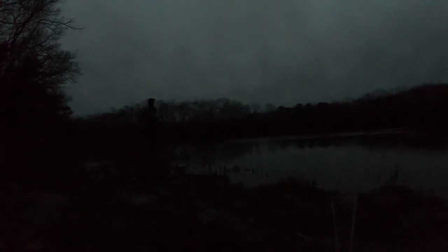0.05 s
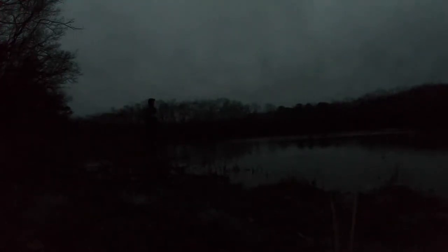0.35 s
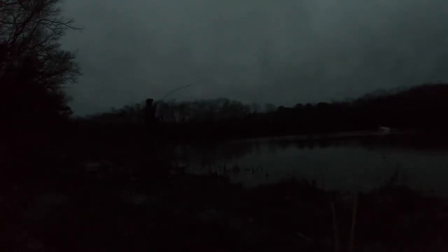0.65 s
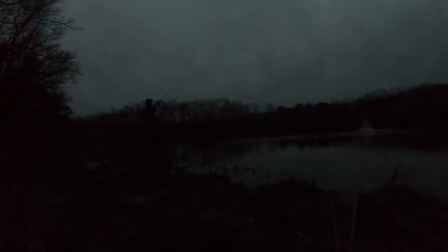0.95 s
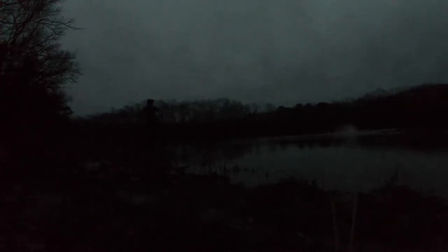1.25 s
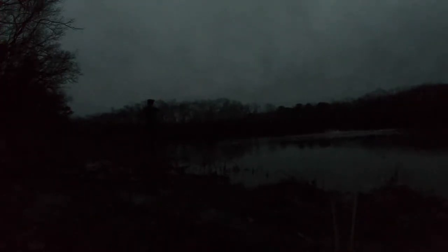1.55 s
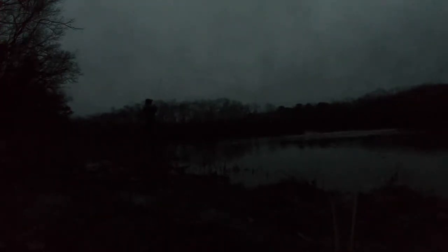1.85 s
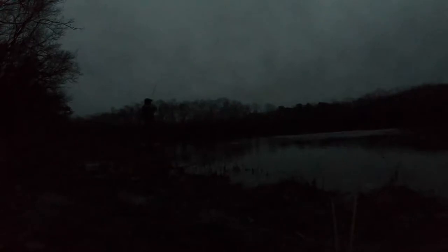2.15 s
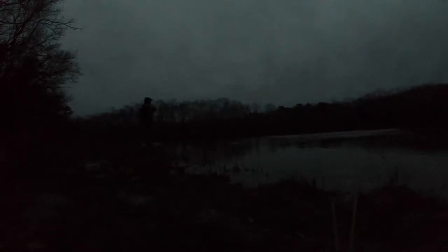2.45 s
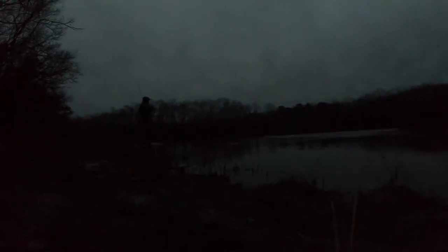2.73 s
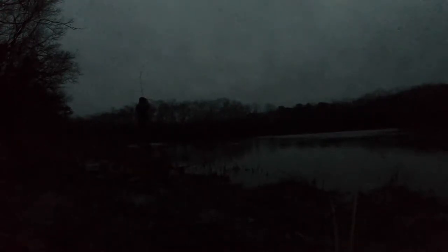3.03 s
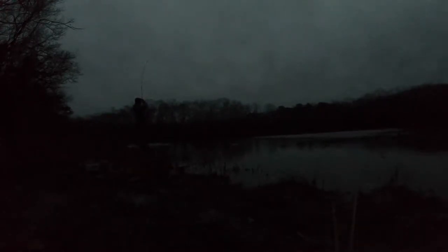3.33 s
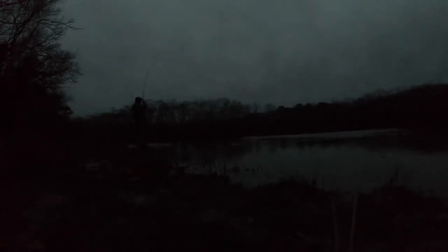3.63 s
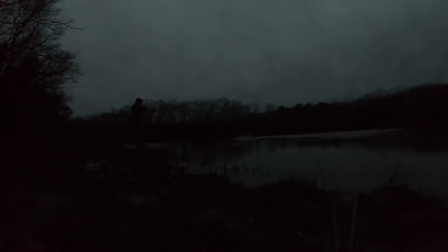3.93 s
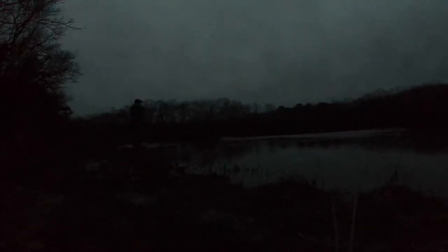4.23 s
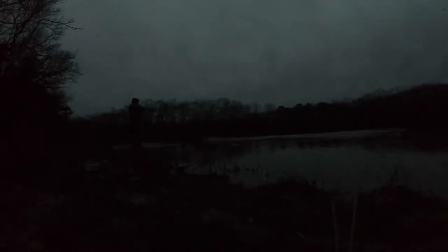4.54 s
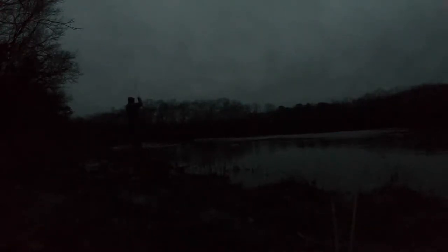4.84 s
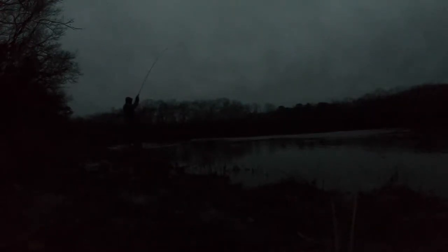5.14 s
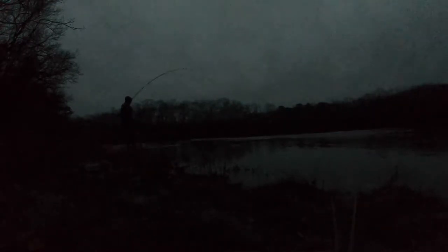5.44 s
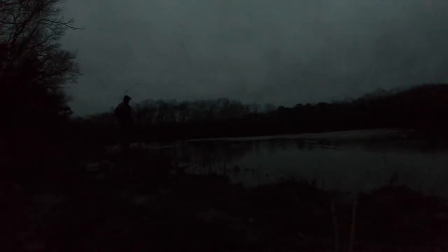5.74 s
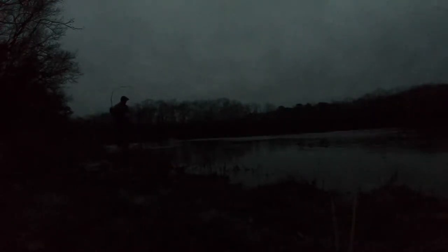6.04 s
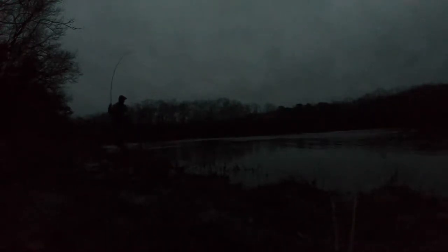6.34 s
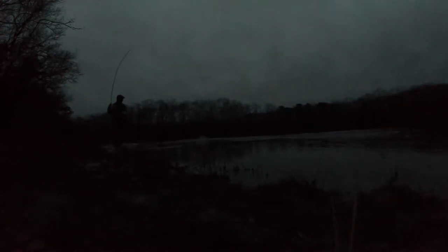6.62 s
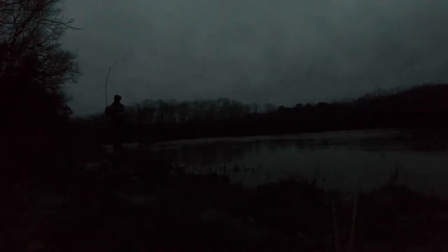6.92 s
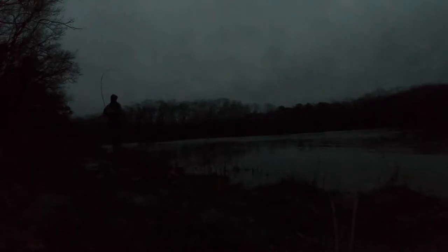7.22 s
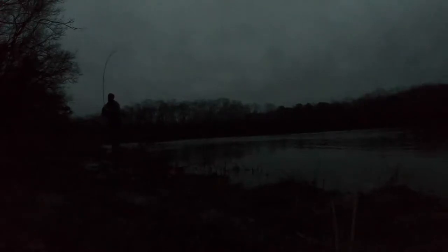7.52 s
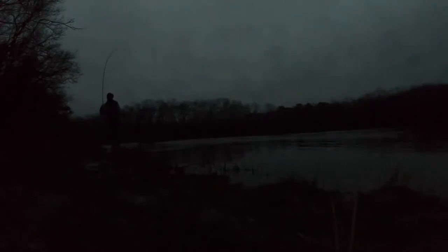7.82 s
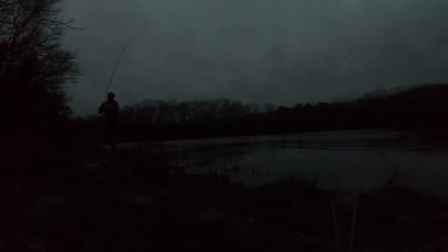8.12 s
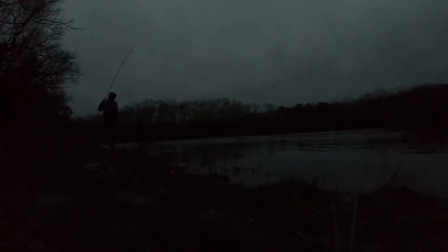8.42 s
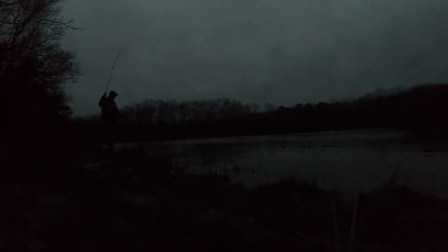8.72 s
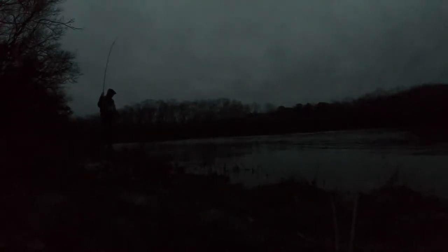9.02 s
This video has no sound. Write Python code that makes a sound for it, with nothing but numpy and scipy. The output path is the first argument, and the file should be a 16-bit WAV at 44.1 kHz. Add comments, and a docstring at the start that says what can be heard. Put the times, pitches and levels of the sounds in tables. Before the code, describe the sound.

Someone wades slowly through the shallows of a quiet pond. After a faint trickle, the first stride pushes through straight ahead from about 0.7 to 2.2 seconds, swelling with bubbling churn, sharp slaps and pattering spray, and ending in a hollow plunge. Water trickles and drips as the sound starts moving left. A second stride sloshes from 3.5 to 4.9 seconds, strongest near 4, followed by small gulps and ticking drops. The third runs from about 5.9 to 7.3 seconds, now well to the left, with a cluster of splashes around 7. Softer trickling, drips and thin hisses of water follow, until a fourth stride begins near 8.9 seconds and splashes at the end. The bank adds a very short, slight echo. Throughout, a distant road gives a low hum with gently swelling engine drones, under the faint hiss of a breeze.

```python
"""Wading through a pond

Slow strides cross the shallows, first straight ahead, then moving off to the left. Each stride swells
and eases, churning up ringing bubbles and throwing a patter of spray. Splashes, slaps, plunges and the
gulps of closing air pockets stand out; water trickles and drips between them. The bank gives a short
answer, and behind it all a far road hums under a faint breeze."""
import sys
import numpy as np
from scipy import signal
from scipy.fft import rfft, irfft, next_fast_len
from scipy.io import wavfile
from scipy.ndimage import map_coordinates

SR = 44100
rng = np.random.default_rng(int(sys.argv[2]) if len(sys.argv) > 2 else 0)


def to_wav(sig):
    """Store sig (one row per channel, or 1-D mono) as 16-bit WAV at the path in sys.argv[1].

    Samples outside -1..1 are clipped; the rate is SR.
    """
    pcm = np.clip(np.atleast_2d(sig), -1, 1) * 32767
    pcm = np.round(pcm).astype(np.int16)
    wavfile.write(sys.argv[1], SR, pcm.T)  # frames by channels


N = 408807

# Cue levels are faders, set ahead of each layer's own trim and EQ; t60 is the time to die by 60 dB.
# a leg pushing through the water: start t/s, hardest push t/s, end t/s, spray level/dB,
# coarse over fine spray/dB, churn level/dB, shallow over deep churn/dB
STRIDES = [(0.714, 1.518, 2.21, -48, 6, -58, 7), (3.49, 4.107, 4.88, -52.5, 6.5, -58, 7.5),
           (5.92, 6.867, 7.263, -52.5, 1.5, -64.5, -3.5), (8.89, 9.27, 9.27, -49.5, -13, -54, 9)]
# water running off and lapping between strides: start t/s, end t/s, spray level/dB, churn level/dB
TRICKLES = [(0.227, 0.27, -77.5, -72), (0.6, 0.705, -66.5, -72), (2.19, 2.317, -63, -70),
            (2.347, 2.845, -77, -71.5), (2.886, 3.092, -65, -66), (3.175, 3.47, -70, -70),
            (4.973, 5.13, -64.5, -71), (5.2, 5.556, -74, -72.5), (5.708, 5.894, -63.5, -65),
            (7.496, 7.82, -68, -72), (7.902, 8.36, -66.5, -68), (8.59, 8.83, -66, -66)]
# sheets of water thrown up and falling back: t/s, length/s, level/dB, coarse over fine spray/dB
SPLASHES = [(0.726, 0.017, -59, 16), (0.897, 0.064, -47, -6), (1.148, 0.013, -46, -12),
            (1.285, 0.039, -53, 11.5), (1.457, 0.037, -46, 7), (1.57, 0.051, -49, 0),
            (1.757, 0.1, -52, 7.5), (1.985, 0.075, -62, 13), (2.032, 0.039, -60, 9),
            (3.58, 0.36, -58.5, 5.5), (3.652, 0.032, -53, 5.5), (3.921, 0.03, -49, 6),
            (4.017, 0.025, -52, 12), (4.073, 0.042, -50.5, 6), (4.388, 0.059, -49, 4.5),
            (4.515, 0.066, -52.5, 7.5), (4.902, 0.12, -58, 8.5), (5.978, 0.13, -51.5, -1),
            (6.23, 0.17, -55.5, 0), (6.639, 0.053, -50.5, 5.5),  (6.777, 0.016, -53.5, 15.5),
            (6.846, 0.041, -60.5, 16.5), (6.901, 0.032, -45.5, 2), (6.923, 0.026, -49, 8),
            (6.975, 0.035, -50.5, 9), (7.055, 0.054, -53.5, 11.5), (7.156, 0.025, -44.5, 8),
            (7.263, 0.052, -50.5, -3), (7.946, 0.045, -59, -20), (8.833, 0.094, -55, -10),
            (9.28, 0.24, -61, 6)]
# waves folding into a cloud of bubbles: t/s, length/s, level/dB, shallow over deep churn/dB
SLOSHES = [(0.772, 0.049, -55, 18.5), (0.843, 0.057, -50, -1), (1.248, 0.09, -56.5, 14),
           (1.468, 0.038, -51.5, 15), (1.576, 0.042, -49, 4), (1.74, 0.13, -52.5, -4.5),
           (3.625, 0.092, -59.5, 3), (3.899, 0.012, -49, -8), (4.003, 0.028, -52, -21),
           (4.21, 0.15, -59, -8.5), (4.334, 0.095, -57.5, 12), (4.415, 0.02, -46.5, 10),
           (4.892, 0.064, -63, 19), (5.972, 0.088, -56, 13), (6.123, 0.056, -54.5, -13),
           (6.215, 0.053, -51, 1), (6.687, 0.087, -56.5, 14.5), (6.876, 0.07, -51, 3),
           (7.076, 0.14, -55, 7), (7.246, 0.044, -56.5, 10), (8.982, 0.16, -53, -7.5),
           (9.262, 0.12, -53, 22)]
# tongues of water slapping the surface: t/s, level/dB, f/Hz, splatter t60/s
SLAPS = [(0.869, -19, 2380, 0.063), (1.025, -25.5, 4600, 0.085), (1.046, -21.5, 5560, 0.025),
         (1.179, -24, 2720, 0.15), (1.2722, -14, 3620, 0.026), (1.584, -27, 4370, 0.022),
         (1.909, -22, 3500, 0.024), (2.002, -18.5, 2160, 0.062), (2.068, -24, 3650, 0.0058),
         (2.8612, -35, 3700, 0.027), (2.8945, -37, 4500, 0.022), (3.659, -23, 3800, 0.018),
         (3.911, -17, 2800, 0.042), (4.083, -24, 3460, 0.03), (4.106, -28, 3000, 0.018),
         (4.169, -22, 3900, 0.022), (4.3905, -26.5, 6100, 0.013), (4.6132, -31.5, 4200, 0.01),
         (4.8805, -40, 4000, 0.016), (4.931, -30.5, 3440, 0.023), (6.492, -19.5, 4900, 0.036),
         (6.6302, -24, 4230, 0.13), (6.689, -19.5, 3620, 0.048), (7.157, -27, 4360, 0.029),
         (7.2385, -27, 4320, 0.04), (8.204, -33, 4540, 0.075), (8.3108, -37.5, 4200, 0.042),
         (8.952, -28.5, 3950, 0.085)]
# air pockets closing: t/s, level/dB, starting f/Hz, t60/s, share by which the pitch climbs within t60
GULPS = [(.238, -52, 798, 0.081, 1.2), (.838, -40.5, 716, 0.067, 0.79), (1.439, -38, 325, 0.14, 1.47),
         (1.634, -35, 810, 0.029, 0.53), (1.728, -39, 329, 0.047, 0.38), (1.952, -41.5, 1420, 0.038, .2),
         (2.039, -29.5, 656, 0.03, 0.25), (2.072, -39.5, 468, 0.071, 2.1), (2.843, -55, 986, 0.059, 1.05),
         (2.891, -52.5, 880, 0.064, 1.1), (3.035, -49, 586, 0.053, 0.35), (3.04, -53.5, 1345, 0.045, 0.23),
         (3.705, -38.5, 830, 0.02, .2), (3.822, -45.5, 660, 0.023, .1), (3.905, -38.5, 475, 0.038, 0.37),
         (3.909, -29, 990, 0.033, 1.23), (3.986, -42, 265, .075, 1), (4.011, -40, 209, 0.052, 2.4),
         (4.022, -41, 535, 0.064, 0.24), (4.176, -38, 504, 0.063, 0.15), (4.215, -44, 572, .05, 0.35),
         (4.29, -45.5, 389, .17, 2.14), (4.412, -41, 895, 0.029, 0.38), (4.586, -41, 556, 0.035, .5),
         (4.668, -42, 662, 0.037, 0.56), (5.112, -41.5, 844, 0.023, 0.11), (5.437, -39, 597, 0.019, 0.58),
         (5.797, -44.5, 873, 0.031, 0.71), (6.111, -34, 1320, 0.023, 0.27), (6.118, -42.5, 390, 0.05, 0.52),
         (6.195, -43, 581, 0.093, 1.23), (6.284, -41, 593, 0.058, 0.33), (6.445, -49, 845, 0.048, 0.71),
         (6.617, -43.5, 850, .045, 0.36), (6.702, -47, 447, 0.047, 2.3), (6.707, -41, 339, 0.06, 0.38),
         (7.081, -43, 1044, 0.022, 0.39), (7.099, -43.5, 303, 0.031, 1.7),
         (7.234, -35.5, 674, 0.035, 0.091), (7.242, -40.5, 433, 0.059, 0.48), (7.311, -47, 870, .025, .1),
         (7.674, -56, 950, .07, .1), (7.745, -47.5, 1110, 0.016, .2), (8.082, -52, 1010, 0.033, .1),
         (8.152, -53, 634, 0.052, 0.32), (8.209, -51, 920, 0.024, .1), (8.475, -56, 900, 0.041, 0.56),
         (8.534, -52, 1300, 0.051, 0.91), (8.897, -41, 520, 0.04, 0.23), (8.932, -39.5, 563, .035, 0.22),
         (8.976, -39.5, 462, 0.071, 0.55), (9.237, -38.5, 1450, 0.07, 0.54)]
# blunt blows pushing a cavity into the water: t/s, level/dB, f/Hz, thump level/dB
PLUNGES = [(.868, -32.5, 1050, -55), (0.966, -29, 1450, -54), (1.272, -27.5, 2100, -59),
           (1.462, -44, 1290, -39), (2.0403, -27.5, 680, -27.5), (2.0422, -28.5, 1690, -45),
           (3.9116, -44, 990, -38), (4.011, -33, 564, -40), (4.106, -37.5, 890, -52),
           (4.169, -26.5, 1230, -48), (4.427, -31, 1320, -51), (5.112, -41, 930, -55),
           (5.439, -40.5, 640, -58), (7.026, -30.5, 1010, -50), (7.237, -40, 720, -50),
           (8.312, -47, 560, -56), (9.238, -29.5, 1100, -50)]
# single drops: t/s, level/dB, nominal f/Hz, t60/s
DRIPS = [(1.8168, -41.5, 3280, .03), (1.8377, -41.5, 6470, .016), (1.918, -42.5, 6700, .02),
         (2.2544, -48, 3270, 0.012), (4.7655, -48, 4480, .008), (4.939, -46, 5400, .01),
         (4.955, -45, 3470, 0.014), (5.1257, -46.5, 3800, 0.0034), (5.545, -41, 4660, 0.01),
         (5.557, -43.5, 5700, 0.0056), (5.704, -43, 5140, 0.0051), (5.7323, -37.5, 4040, 0.0027),
         (5.844, -44.5, 5200, 0.013), (5.918, -37, 5150, 0.004), (5.982, -38.5, 3820, 0.0087),
         (6.5578, -38.5, 4550, 0.0072), (6.578, -38.5, 3400, 0.0086), (6.608, -39, 5630, 0.005),
         (6.838, -35.5, 5000, 0.013), (7.06, -40.5, 5230, 0.013), (7.0755, -39.5, 3550, 0.0095),
         (7.1289, -35.5, 4650, 0.0036), (7.289, -41.5, 5400, .013), (7.3093, -40, 5750, 0.0049),
         (7.5364, -40.5, 3940, .0068), (7.9508, -40.5, 5350, .0069), (8.056, -46, 5820, 0.0049),
         (8.3857, -54.5, 3840, 0.014), (8.504, -46, 4940, 0.0062), (8.642, -51, 5300, 0.0067),
         (9.126, -42, 5190, 0.0058)]
# thin, hissing jets: start t/s, length/s, level/dB, first f/Hz, last f/Hz
SWISHES = [(3.247, 0.44, -70.5, 3730, 5560), (7.879, 0.32, -72, 4850, 2950), (8.647, 0.23, -66, 3000, 4830)]
# the finest spray after a hard splash: t/s, length/s, level/dB
SPARKLES = [(.885, .045, -70), (4.073, .06, -81), (4.414, 0.047, -81), (6.638, .03, -70), (6.938, .09, -80),
            (7.144, 0.044, -77), (9.27, 0.089, -79)]

# EQ of spray and drips: f/Hz, level/dB
SPRAY_EQ = [(300, -32.5), (900, -20), (1900, -16), (2600, -8.5), (3800, -0.5), (5000, -0.5), (5900, 3),
            (7300, -7), (8300, -24), (9500, -35), (10300, -45), (13000, -48.5), (16000, -49)]
# EQ of the churning water: f/Hz, level/dB
CHURN_EQ = [(120, 0), (300, -5.5), (600, -1), (1200, 2.5), (1900, -1), (3000, -14), (8000, -81)]
# EQ of the slaps: f/Hz, level/dB
SLAP_EQ = [(200, -14.5), (1200, -5.5), (3000, 1), (6000, 8.5), (7400, 4), (8400, -12), (9600, -11),
           (10500, -25), (13000, -7), (16000, -24)]
# the wader's path: t/s, position (0 ahead, 1 left), extra lean to the left/dB
PATH = [(0, 0, 0), (2, 0, 0), (3.4, .7, 0), (4.4, .75, -.5), (6, .85, 0), (7.2, .95, 0), (8, 1, 1.2),
        (8.9, 1, 3)]
# stereo image straight ahead: f/Hz, level/dB, left over right/dB, phase lead of the left/rad
IMAGE_AHEAD = [(300, 0, 6, -.8), (550, 0, 3, -1.5), (870, 0, -3.5, -1.6), (1500, 0, -4.5, -.7),
               (2550, 1, -5, -.7), (4000, 1.2, -1, -.5), (5050, -5, 1, -1.4), (6000, .5, 2.5, -1.4),
               (7500, 3, 4.5, -1.5), (9500, 7, 2, -1.2)]
# stereo image off to the left: f/Hz, level/dB, left over right/dB, phase lead of the left/rad
IMAGE_LEFT = [(300, 0, 6.5, -.8), (550, 0, 5, -1.4), (870, 0, 2, -1.6), (1500, 0, 2.5, -.7),
              (2550, -1, 1.5, -.7), (4400, 1, 4.3, 0), (7500, -2, 4, .7), (9500, -4, 2, .4)]
# stereo width of spray and churn: f/Hz, left-right correlation
WATER_LIKENESS = [(150, 0.63), (500, 0.64), (1000, 0.46), (4500, 1), (7000, 0.32), (10000, 0.2)]
# decay of the bank's answer: f/Hz, t60/s
BANK_DECAY = [(200, 0.023), (2000, 0.29), (10000, 0.11)]

# EQ of the road's rumble: f/Hz, level/dB
RUMBLE_EQ = [(25, -20), (60, -15), (110, -20.5), (128, -20), (142, -1.5), (180, -1.5), (235, 3),
             (265, -4.5), (310, -7), (400, -14), (550, -24), (1200, -70.5)]
# fader ride of the lower engine drone: t/s, level/dB
LOW_DRONE_RIDE = [(0, -63.5), (0.45, -71.5), (0.85, -61.5), (1.65, -79.5), (2.4, -64), (3.0, -71),
                  (4.8, -65), (5.4, -74.5), (6.1, -66), (6.38, -54), (6.75, -65.5), (7.05, -62.5),
                  (7.8, -62), (8.2, -68), (8.7, -68.5), (9.0, -58.5), (9.27, -77)]
# fader ride of the higher engine drone: t/s, level/dB
HIGH_DRONE_RIDE = [(0, -81), (0.5, -65), (1.6, -91), (2.2, -58.5), (3.0, -69.5), (4.7, -72), (5.3, -67),
                   (6.0, -70), (7.0, -74), (7.4, -57.5), (7.65, -53.5), (8.0, -64), (8.3, -58.5),
                   (9.27, -67.5)]
# EQ of the breeze: f/Hz, level/dB
BREEZE_EQ = [(300, -25.5), (550, -7), (820, 3), (1300, -15.5), (2200, -14.5), (4000, -19.5), (6500, -13),
             (8300, -24), (12500, -30.5), (15500, -47)]

SURGE_LEAD_S = .3  # run-up to the peak of a surge


def wading(spray_db=1, churn_db=-2, bank_db=-13, low_cut_hz=195):
    """The water sounds, thinned of deep bass, come from one spot that drifts to the left."""
    fine, coarse, deep, shallow = flow()
    source = amp(spray_db) * spray(fine, coarse) + amp(churn_db) * churn(deep, shallow)
    source = source + swishes() + slaps() + plunges() + drips() + gulps()
    source = signal.lfilter(*signal.butter(2, low_cut_hz, "highpass", fs=SR), source)
    position, lean_db = curves(PATH)
    ahead = heard_from(IMAGE_AHEAD, source)
    left = panned(heard_from(IMAGE_LEFT, source), lean_db)
    direct = (1 - position) * ahead + position * left
    return direct + amp(bank_db) * bank(direct) + sparkles()


def flow():
    """Strides, trickles, splashes and sloshes drive the gains of the spray and churn layers."""
    t, power = np.arange(N) / SR, np.zeros((4, N))
    sag_db = np.array([[8], [10], [5], [5]])  # each layer's drop from hardest push to a stride's ends
    for start, push, end, *levels in STRIDES:
        slack = np.interp(t, [start, push, end], [1, 0, 1])
        stride_db = gate(start, end, attack_s=.011, release_s=.14) - sag_db * slack
        power += layer_powers(*levels) * amp(stride_db) ** 2
    for start, end, spray_db, churn_db in TRICKLES:
        trickle = amp(gate(start, end, attack_s=.29, release_s=.28))
        power += layer_powers(spray_db, coarse_db=-2.5, churn_db=churn_db, shallow_db=4) * trickle ** 2
    for s, length, db, coarse_db in SPLASHES:
        splash = layer_powers(spray_db=db, coarse_db=coarse_db)[:2] * surge(length)
        add(power[:2], s - SURGE_LEAD_S, splash)
    for s, length, db, shallow_db in SLOSHES:
        slosh = layer_powers(churn_db=db, shallow_db=shallow_db)[2:] * surge(length)
        add(power[2:], s - SURGE_LEAD_S, slosh)
    return np.sqrt(power)


def layer_powers(spray_db=0, coarse_db=0, churn_db=0, shallow_db=0):
    """Powers of fine spray, coarse spray, deep churn and shallow churn."""
    tilt_db = shallow_db / 2
    return amp([[spray_db], [spray_db + coarse_db], [churn_db - tilt_db], [churn_db + tilt_db]]) ** 2


def spray(fine_gain, coarse_gain, ping_db=-7, tick_db=-18, split_hz=3100, flutter_db=1.92, sway_db=1.77):
    """Falling droplets patter and tick over a fine mist; a few ring briefly, coarse ones sound lower."""
    patter = swarm(1200, 9000, cycles=7, rise=.1, scatter_db=2.3, count=17000, samples=160)
    pings = swarm(1500, 7000, cycles=40, rise=.08, scatter_db=3.1, count=1700, samples=1000)
    ticks = swarm(2800, 7000, cycles=9, rise=.1, scatter_db=2, count=420, samples=200)
    mist = rng.standard_normal((2, N))
    fizz = patter + amp(ping_db) * pings + amp(tick_db) * ticks + mist
    fizz = spread(coloured(fizz, SPRAY_EQ), WATER_LIKENESS)
    lows = filtered(fizz, lambda hz: 1 / (1 + (hz / split_hz) ** 10))
    fine = fine_gain * (fizz - lows) * amp(flutter_db * wobble(90))
    coarse = coarse_gain * lows * amp(flutter_db * wobble(90))
    return (fine + coarse) * amp(sway_db * wobble(22))


def churn(deep_gain, shallow_gain, wash_db=1, split_hz=850, sway_db=1.9):
    """Larger bubbles gurgle in the wash; shallow stirring makes smaller, higher ones."""
    gurgle = swarm(260, 2000, cycles=10, rise=.35, scatter_db=1.8, count=3300, samples=1500)
    wash = amp(wash_db) * rng.standard_normal((2, N))
    mix = spread(coloured(gurgle + wash, CHURN_EQ), WATER_LIKENESS)
    lows = filtered(mix, lambda hz: 1 / (1 + (hz / split_hz) ** 4))
    deep = deep_gain * lows * amp(sway_db * wobble(25))
    shallow = shallow_gain * (mix - lows) * amp(sway_db * wobble(25))
    return deep + shallow


def slaps(trim_db=-9, splatter_db=-13, burst_t60=.029, brightness=1.64):
    """Water cracks on the surface, bursts and splatters; a broad, low slap has little treble."""
    track, t = np.zeros((2, N)), np.arange(SR // 12) / SR
    for s, db, hz, t60 in SLAPS:
        noise = rng.standard_normal((3, len(t)))
        sides, centre = noise[:2], noise[2]
        crack = peak_one(bubble(t, hz, t60=.0034, rise=.02, attack_s=.000088))
        burst = .09 * centre * amp(-60 * t / burst_t60)
        splatter = (1.4 * centre + 2.3 * sides) * amp(splatter_db - 60 * t / t60)
        lowpass = signal.butter(4, brightness * hz, fs=SR)
        add(track, s + .001062, amp(db + trim_db) * signal.lfilter(*lowpass, crack + burst + splatter))
    return coloured(track, SLAP_EQ)


def gulps(big_db=-6, small_db=-15, quiver_per_s=170, quiver_cycles=.16, throb_db=2.2, shed_s=.023):
    """A cavity closes into one big bubble that swells, glides up, quivers and sheds five small ones."""
    track, t = np.zeros(N), np.arange(SR // 5) / SR
    quiver, throb = wobble(quiver_per_s), wobble(quiver_per_s)  # unsteady shape sways phase and level
    for s, db, hz, t60, rise in GULPS:
        span = (round(s * SR) + np.arange(len(t))) % N
        shift_s = quiver_cycles * np.minimum(2 * t / t60, 1) * quiver[span] / hz
        big = peak_one(bubble(np.abs(t + shift_s), hz, t60, rise, attack_s=.16 * t60))
        add(track, s, amp(db + big_db + throb_db * throb[span]) * big)
        for delay, pitch, life in rng.random((5, 3)):
            small_hz = hz * 2 ** (1.9 * pitch - .9)  # within an octave either way
            small = bubble(t, small_hz, t60=.038 * (.5 + life), rise=.18, attack_s=.00069)
            add(track, s + shed_s * delay ** 2, amp(db + small_db) * small)
    return track


def plunges(ring_t60=.014, froth_t60=.028, froth_gain=.25, swell_s=.0025):
    """A blunt blow: a low thump and a few swings of pressure inside a dull burst of froth."""
    track, t = np.zeros(N), np.arange(SR // 20) / SR
    for s, db, hz, thump_db in PLUNGES:
        band = signal.butter(3, [hz / 2, hz * 2], "bandpass", fs=SR)
        froth = rms_one(signal.lfilter(*band, rng.standard_normal(len(t))))
        envelope = np.minimum(t / swell_s, 1) * amp(-60 * np.maximum(t - swell_s, 0) / froth_t60)
        ring = bubble(t, hz, ring_t60, rise=.081, attack_s=1 / hz)
        thump = bubble(t, hz=190, t60=.022, rise=0, attack_s=.00056)
        add(track, s - swell_s / 2, amp(db) * froth_gain * froth * envelope)
        add(track, s, amp(db - 3.5) * ring + amp(thump_db) * thump)
    return track


def drips(trim_db=2.5, detune=.951, max_rise=1.02, tick_t60=.0086):
    """A drop ticks on the surface and traps a tiny bubble; some chirp upwards, others hardly glide."""
    track, t = np.zeros(N), np.arange(SR // 25) / SR
    for s, db, hz, t60 in DRIPS:
        chirp = peak_one(bubble(t, detune * hz, t60, max_rise * rng.random() ** 2, attack_s=.00046))
        tick = rng.standard_normal(len(t)) * amp(-60 * t / tick_t60)
        add(track, s, amp(db + trim_db) * (chirp + tick))
    return coloured(track[None], SPRAY_EQ)


def swishes(width=.08):
    """A narrow hiss slides in pitch as its jet thins or thickens."""
    track = np.zeros(N)
    for s, length, db, first_hz, last_hz in SWISHES:
        progress = np.linspace(0, 1, int(length * SR))
        phase = 2 * np.pi * np.cumsum(first_hz * (last_hz / first_hz) ** progress) / SR
        noise = rng.standard_normal((2, SR))[:, :len(progress)]
        slow = signal.lfilter(*signal.butter(2, width * first_hz, fs=SR), noise)
        hiss = rms_one(slow[0] * np.cos(phase) + slow[1] * np.sin(phase))
        arch = np.sqrt(np.abs(np.sin(np.pi * progress)))
        add(track, s, amp(db) * hiss * arch)
    return track


def sparkles():
    """Brief showers of the tiniest droplets, different on each side."""
    power = np.zeros(N)
    for s, length, db in SPARKLES:
        add(power, s - SURGE_LEAD_S, amp(db) ** 2 * surge(length))
    return np.sqrt(power) * swarm(7000, 13000, cycles=22, rise=0, scatter_db=3, count=14000, samples=64)


def bank(x):
    """The shore throws back a short, diffuse tail that lasts longest in the mids."""
    hz, t, noise = signal.stft(rng.standard_normal((2, SR // 3)), SR, nperseg=256)
    decay = amp(-60 * t / along(BANK_DECAY, hz)[:, None])
    tail = signal.istft(noise * decay, SR, nperseg=256)[1]
    return signal.fftconvolve(x, tail / np.linalg.norm(tail[0]), axes=1)[:, :N]


def road(rumble_db=-60.5, low_trim_db=1):
    """Far traffic: a steady low rumble with two engine drones that swell and fade."""
    (low_db,), (high_db,) = curves(LOW_DRONE_RIDE), curves(HIGH_DRONE_RIDE)
    rumble = spread(coloured(rng.standard_normal((2, N)), RUMBLE_EQ), likeness=[(40, .51), (200, .078)])
    low = amp(low_db + low_trim_db) * drone(centre_hz=152.2, width_hz=9)
    high = amp(high_db) * drone(centre_hz=215.5, width_hz=11.3)
    return panned(amp(rumble_db) * rumble + low + high, lean_db=5)


def drone(centre_hz, width_hz, steadiness=.34):
    """A fuzzy, distant engine tone: a wavering band of noise with its level partly evened out."""
    band = filtered(rng.standard_normal((2, N)), lambda hz: 1 / (1 + ((hz - centre_hz) / width_hz) ** 2))
    envelope = np.abs(signal.hilbert(band, next_fast_len(N)))[:, :N]
    return spread(band / envelope ** steadiness, likeness=[(150, .63)])


def breeze(level_db=-73):
    """Faint air moves over the open water in a wide, gently wavering hiss."""
    hiss = spread(coloured(rng.standard_normal((2, N)), BREEZE_EQ), likeness=[(500, .048), (5000, .022)])
    return panned(hiss, lean_db=1) * amp(level_db + wobble(3.15))


def bubble(t, hz, t60, rise, attack_s):
    """A ringing air pocket; its pitch climbs as it nears the surface."""
    phase = 2 * np.pi * hz * t * (1 + rise * t / t60 / 2)
    return np.sin(phase) * amp(-60 * t / t60) * (1 - np.exp(-t / attack_s))


def swarm(low_hz, high_hz, cycles, rise, scatter_db, count, samples):
    """Two unrelated channels of bubbles, random in moment, pitch and strength, each at rms 1."""
    pair, age = [], np.arange(samples)
    for _ in range(2):
        when, pitch, life, strength = rng.random((count, 4)).T[:, :, None]
        hz = low_hz * (high_hz / low_hz) ** pitch
        gain = amp(-scatter_db * np.log(strength + .02))  # many quiet ones, a few loud
        rings = gain * bubble(age / SR, hz, cycles * (.5 + life) / hz, rise, attack_s=2 / hz)
        slots = (when * N).astype(int) + age
        pair.append(rms_one(np.bincount(slots.ravel(), rings.ravel(), N)[:N]))
    return np.array(pair)


def gate(start, end, attack_s, release_s):
    """A fader in dB: 0 from start to end, 30 lower attack_s before and release_s after."""
    t = np.arange(N) / SR
    return -30 * (np.maximum(start - t, 0) / attack_s + np.maximum(t - end, 0) / release_s)


def surge(length, tail=1.08):
    """Power of a brief surge that dies a little more slowly than it grows."""
    t = np.arange(SR) / SR - SURGE_LEAD_S
    slope_s = length / 2 * np.where(t > 0, tail, 1)
    return 1 / np.cosh(np.minimum(np.abs(t) / slope_s, 20)) ** 2


def wobble(rate):
    """A smooth random curve, rate knots a second."""
    return map_coordinates(rng.standard_normal(4096), [np.arange(N) * rate / SR], mode="wrap")


def heard_from(image, x):
    """Places a sound by shading and delaying each band differently on the left and the right."""
    rows, sides = np.array(image), np.array([[.5], [-.5]])

    def response(hz):
        gain_db, lean_db, lead = (along(np.c_[rows[:, 0], column], hz) for column in rows.T[1:])
        pair = amp(sides * lean_db) * np.exp(1j * sides * lead)
        return amp(gain_db) * pair / np.abs(pair.mean(axis=0))
    return filtered(x, response)


def spread(pair, likeness):
    """Two unrelated signals become left and right, as alike as the (f/Hz, correlation) points say."""
    def mid_and_side(hz):
        angle = np.arccos(along(likeness, hz)) / 2
        return np.array([np.cos(angle), np.sin(angle)])
    mid, side = filtered(pair, mid_and_side)
    return np.array([mid + side, mid - side]) / np.std(mid)


def panned(x, lean_db):
    """Louder on the left by lean_db."""
    return x * amp(np.array([[.5], [-.5]]) * lean_db)


def coloured(x, eq, taps=4096):
    """A minimum-phase EQ through (f/Hz, level/dB) points, so nothing rings ahead of a hit."""
    cepstrum = irfft(np.log(amp(along(eq, np.fft.rfftfreq(taps, 1 / SR)))))
    cepstrum[1:taps // 2] *= 2
    cepstrum[taps // 2 + 1:] = 0
    impulse = irfft(np.exp(rfft(cepstrum)))
    return signal.oaconvolve(x, impulse[None], axes=1)[:, :N]


def filtered(x, response):
    """x through a complex frequency response."""
    size = next_fast_len(N + SR // 4)
    return irfft(rfft(x, size) * response(np.fft.rfftfreq(size, 1 / SR)), size)[..., :N]


def along(points, hz):
    """Reads (f/Hz, value) points on a log frequency axis."""
    knots_hz, values = np.transpose(points)
    return np.interp(np.log(hz + 1), np.log(knots_hz + 1), values)


def curves(rows):
    """One automation curve for each column after the time."""
    times, *columns = np.transpose(rows)
    return [np.interp(np.arange(N) / SR, times, column) for column in columns]


def add(track, s, sound):
    """Mixes a sound into a track at s seconds."""
    part = track[..., max(round(s * SR), 0):][..., :sound.shape[-1]]
    part += sound[..., :part.shape[-1]]


def amp(db):
    """Decibels to gain."""
    return 10 ** (np.asarray(db) / 20)


def rms_one(x):
    """Scaled to rms 1."""
    return x / np.sqrt(np.mean(x ** 2) + 1e-20)


def peak_one(x):
    """Scaled to peak 1."""
    return x / np.abs(x).max()


def scene():
    """Wading in front, road and breeze behind."""
    return wading() + road() + breeze()


def record(dry, top_hz=15600):
    """A brick-wall high cut takes off the very top."""
    return filtered(dry, lambda hz: hz < top_hz)


dry = scene()
out = record(dry)
to_wav(out)
```